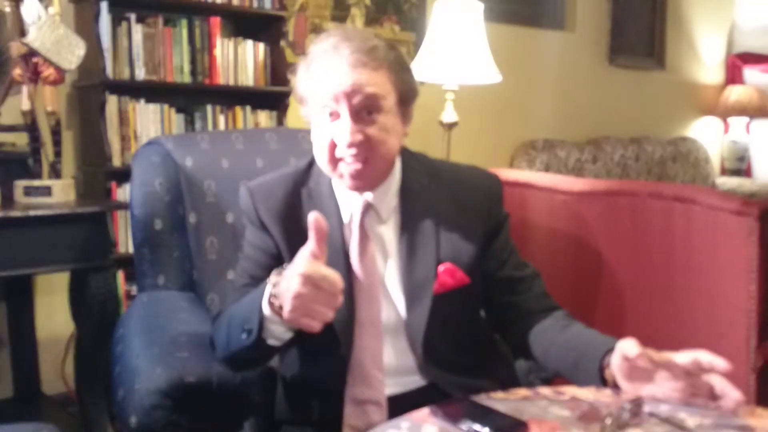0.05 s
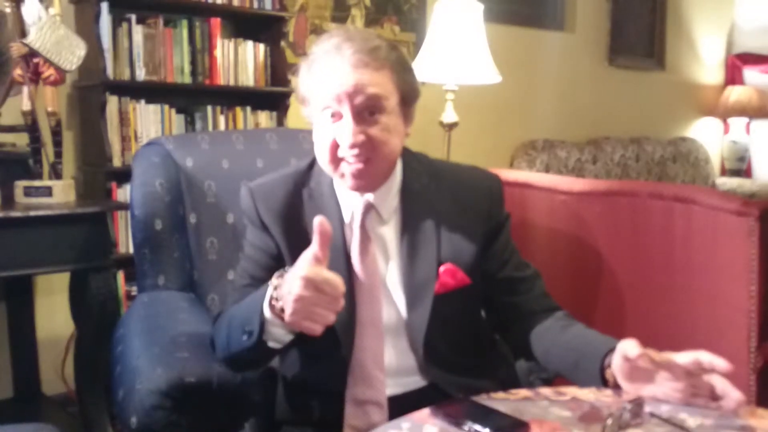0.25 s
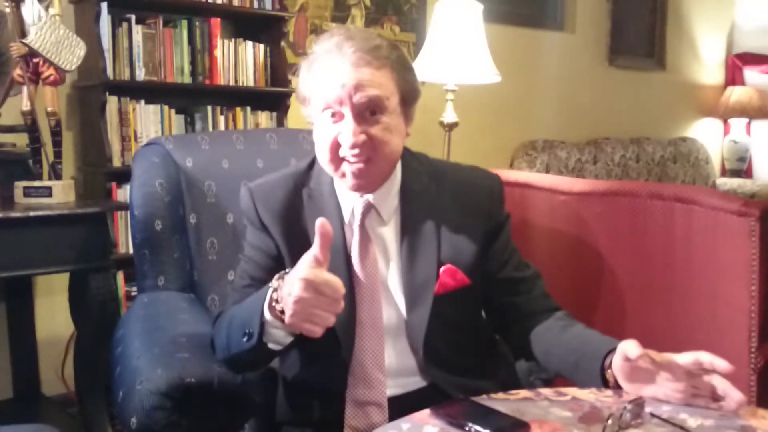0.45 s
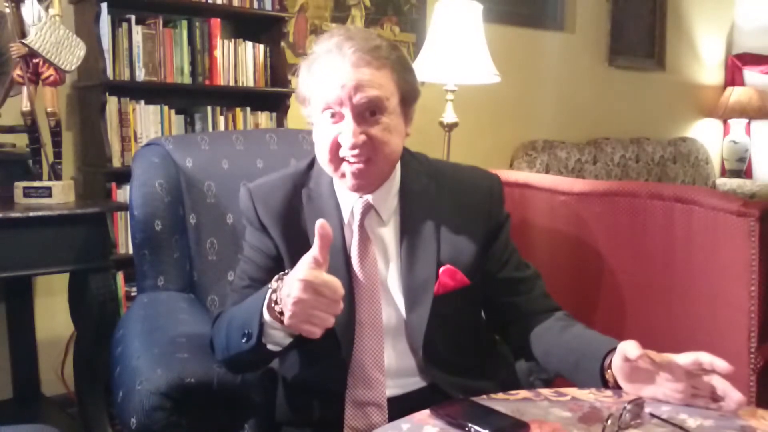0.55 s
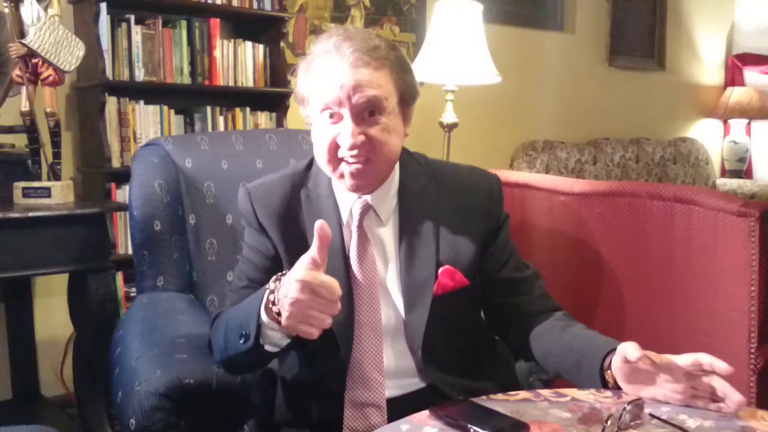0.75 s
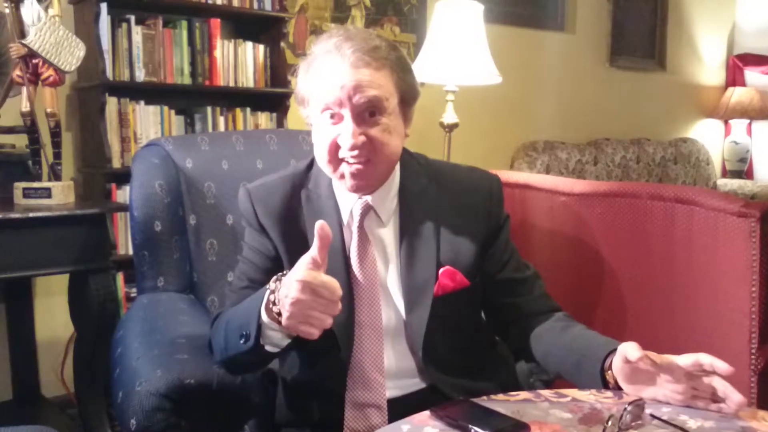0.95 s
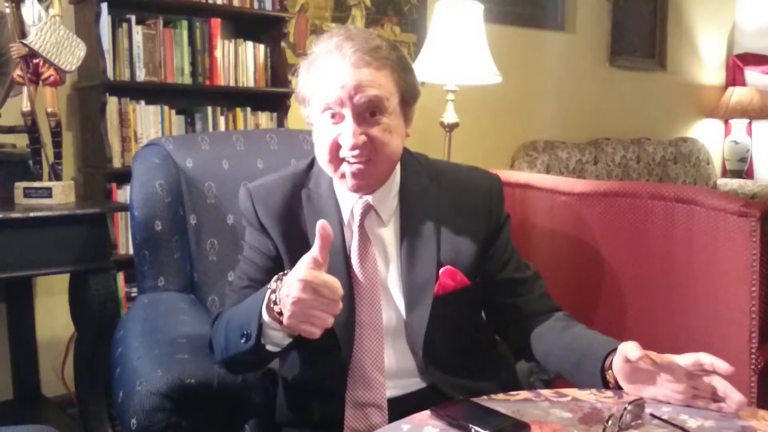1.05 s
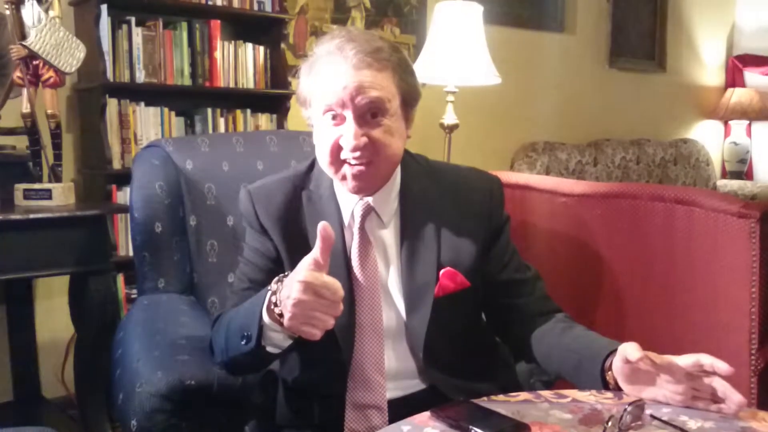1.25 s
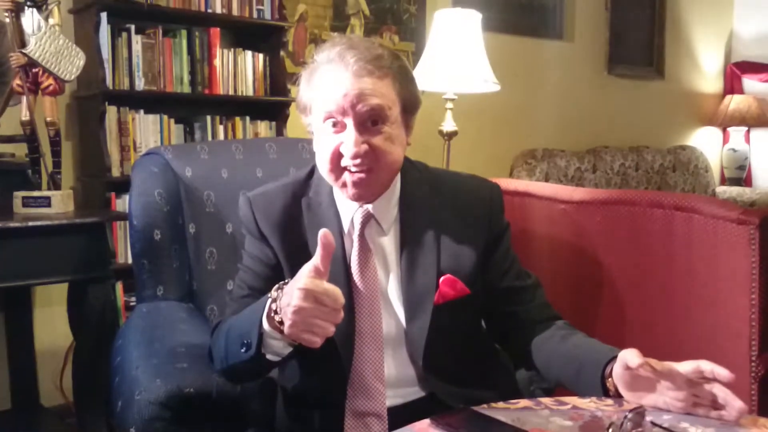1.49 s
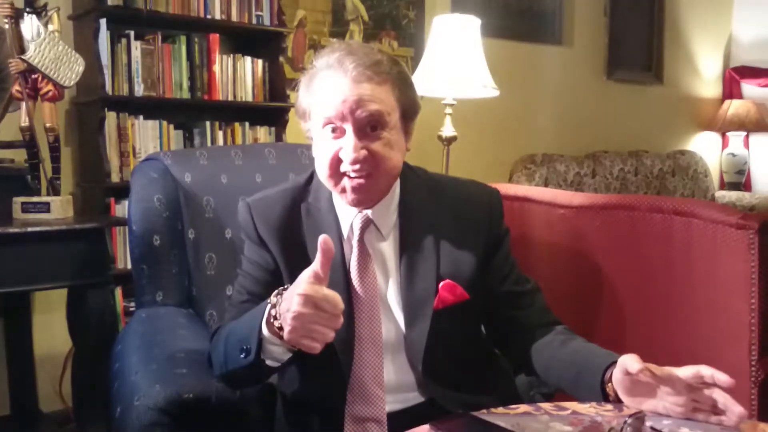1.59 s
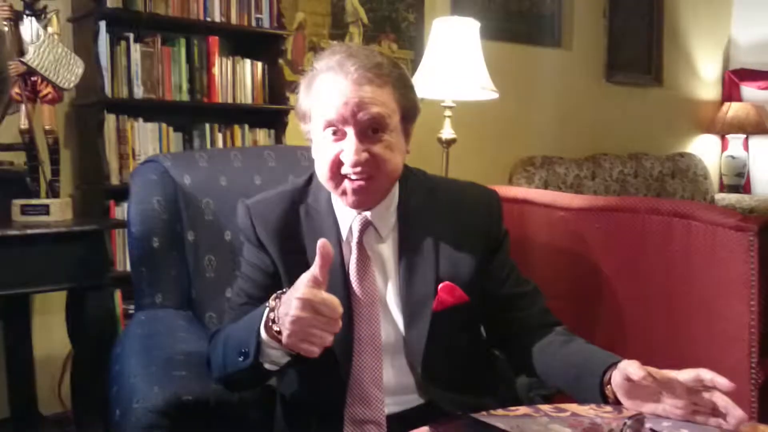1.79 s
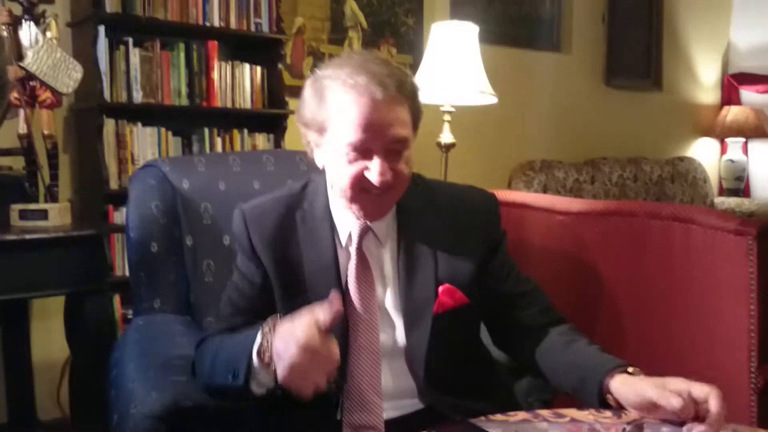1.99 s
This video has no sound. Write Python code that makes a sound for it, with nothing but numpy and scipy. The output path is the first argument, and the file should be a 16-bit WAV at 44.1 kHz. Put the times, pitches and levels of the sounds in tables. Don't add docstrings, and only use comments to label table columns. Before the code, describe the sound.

Two brief low phone vibration buzzes, close up, after a second of quiet, droning room air.

```python
import sys
import numpy as np
from scipy import signal
from scipy.fft import rfft, irfft, next_fast_len
from scipy.io import wavfile
from scipy.ndimage import uniform_filter1d, map_coordinates

SR = 44100
rng = np.random.default_rng(int(sys.argv[2]) if len(sys.argv) > 2 else 0)


def bounce(signal):
    frames = np.transpose(np.atleast_2d(signal))
    limited = np.clip(frames, -1, 1)
    pcm = np.round(limited * 32767).astype(np.int16)
    wavfile.write(sys.argv[1], SR, pcm)


def gain_from_decibels(decibels):
    exponent = np.asarray(decibels, float) / 20
    return 10 ** exponent


N = 89478

# (time [s], gain [dB])
BASS_GAIN = [
    (.95, -2),
    (1.1, 9.5),
    (1.25, 14.5),
    (1.5, 8),
    (1.75, 16),
    (2.03, 14),
]


def unit(x):
    return x / np.sqrt(np.mean(x ** 2) + 1e-20)


def along(points, hz):
    f, *values = np.transpose(points)
    return np.squeeze([np.interp(np.log(hz + 1), np.log(f + 1), v) for v in values])


def curves(rows):
    s, *columns = np.transpose(rows)
    return [np.interp(np.arange(N) / SR, s, c) for c in columns]


def wobble(rate):
    knots = rng.standard_normal(int(N * rate / SR) + 4)
    return map_coordinates(knots, [np.arange(N) * rate / SR])


def filtered(x, response):
    m = next_fast_len(N + 8192)
    return irfft(rfft(x, m) * response(np.fft.rfftfreq(m, 1 / SR)), m)[..., :N]


def room_air():
    # (frequency [Hz], left level [dB per Hz], right level [dB per Hz])
    air_colour = [(153, -15, -10.5), (675, 1.5, 3.5), (2000, -4, 2.5), (3980, -11.5, -2), (4670, -14, -10),
                  (7480, -8, -9.5), (11500, -20.5, -20.5), (15000, -15, -14.5)]
    # (frequency [Hz], correlation [-1 to 1])
    coherence = [(150, 0.075), (640, -0.36), (1400, 0.12), (15000, -0.065)]
    z = signal.stft(rng.standard_normal((2, N)), nperseg=512)[2]
    patches = uniform_filter1d(rng.standard_normal(z.shape[1:]), 6, 0)
    patches = uniform_filter1d(patches, 14, 1)
    pair = signal.istft(z * gain_from_decibels(1.4 * unit(patches)), nperseg=512)[1][:, :N]

    def mid_and_side(hz):
        angle = np.arccos(np.clip(along(coherence, hz), -1, 1)) / 2
        return np.array([np.cos(angle), np.sin(angle)])

    mid, side = filtered(pair, mid_and_side)
    ports = np.array([mid + side, mid - side])
    air = filtered(ports, lambda hz: gain_from_decibels(along(air_colour, hz)) * (hz > 100))
    return gain_from_decibels(-60.5 + 0.032 * curves(BASS_GAIN)[0]) * unit(air)


def distant_machine():
    # (frequency [Hz], level [dB per Hz])
    murmur_colour = [(30, -33), (60, -19), (100, -5.5), (250, -7), (600, -10.5), (1200, -23), (2500, -56)]
    # (frequency [Hz], level [dB])
    partials = [(50, -3.5), (59, -23), (68, 0), (77.5, -1.5), (87, -22)]
    bass_db, t = curves(BASS_GAIN)[0], np.arange(N) / SR
    a, b = filtered(rng.standard_normal((2, N)), lambda hz: gain_from_decibels(along(murmur_colour, hz)))
    lines = np.zeros(N)
    for hz, db in partials:
        phase = 2 * np.pi * hz * t + 1.05 * wobble(2.9) + 7 * rng.random()
        lines += gain_from_decibels(db + 2.4 * wobble(4.67)) * np.sin(phase)
    murmur = np.array([unit(1.1 * b - a), unit(a)]) * gain_from_decibels(-5.5)
    drone = unit(lines) * [[-1], [1]] + murmur
    return gain_from_decibels(-61.5) * drone * gain_from_decibels([-5 + 1.01 * bass_db, bass_db])


def table_top():
    # (time [s], frequency [Hz], left level [dB])
    hum_path = [
        (1.09, 52, -94),
        (1.13, 54.3, -31),
        (1.17, 48.2, -37),
        (1.21, 47.6, -41),
        (1.4, 47.7, -39),
        (1.58, 45.7, -45),
        (1.66, 53.4, -34.5),
        (1.7, 52, -62),
        (1.76, 49.7, -68),
    ]
    # (time [s], length [s], frequency [Hz], right level [dB])
    rattles = [
        (0.075, 0.026, 246, -54.5),
        (0.337, 0.22, 1943, -62),
        (1.299, .05, 277, -51),
        (1.705, 0.055, 216, -41),
        (1.79, 0.018, 195, -34),
        (1.865, 0.052, 183, -28),
        (1.923, 0.041, 202, -45),
        (1.957, 0.036, 226, -47),
    ]
    hz, db = curves(hum_path)
    hum = np.sqrt(2) * gain_from_decibels(db + 1.2 * wobble(5.3)) * np.sin(2 * np.pi * np.cumsum(hz) / SR)
    t, rattle = np.arange(N) / SR, np.zeros(N)
    for s, length, hz, db in rattles:
        swell = np.cos(np.pi * np.clip((t - s) / length, -.5, .5)) ** 2
        rattle += gain_from_decibels(db - 1) * swell * np.sin(2 * np.pi * hz * (t - s))
    return hum * gain_from_decibels([[0], [-49]]) + rattle * gain_from_decibels([[-41], [0]])


def ticks():
    # (time [s], right peak level [dB], frequency [Hz], left minus right [dB], decay by 60 dB [s])
    clicks = [(0.1517, -45, 2570, -25, 0.0045), (.151, -58, 7400, 11, 0.0046),
              (0.1542, -64.5, 8550, 9, .008), (0.158, -50, 2500, -10, .004), (.1585, -65, 7250, 6, .009),
              (0.162, -64, 8400, 10, 0.0095), (0.1758, -45.5, 14000, -16, .004),
              (0.175, -62, 8300, 16, .004), (0.1782, -66, 9300, 11, 0.0097), (0.184, -68, 7550, 10, .008),
              (.202, -67, 9500, 8, .006), (0.946, -48, 9100, -22, 0.0017), (0.9575, -36, 2000, -26, 0.0035),
              (0.9573, -42, 3400, -20, 0.0037), (0.963, -43, 855, -15, 0.01),
              (0.9572, -48, 850, -19, 0.0065), (0.970, -47, 830, -15, 0.01),
              (0.963, -36, 2000, -17, 0.0044), (0.9715, -47, 2600, -12, .003),
              (1.308, -39, 5200, -18, 0.0033), (1.327, -38, 3500, -15, .004), (1.342, -40, 3530, -23, .004),
              (1.3425, -51, 6400, -15, 0.0031), (1.3775, -36, 2320, -30, 0.0025),
              (1.378, -41.5, 820, -19, 0.0068), (1.546, -41, 2200, -21, 0.0026),
              (1.553, -46.5, 3550, -27, 0.013), (1.563, -39, 2000, -21, 0.0035),
              (1.565, -39.5, 840, -17, 0.0063), (1.5703, -32.5, 4230, -25, 0.0033),
              (1.571, -32, 2300, -24, .004), (1.578, -41, 3800, -22, .004),
              (1.9395, -40, 4400, -21, 0.0046), (1.9425, -35, 3700, -25, .004),
              (1.9421, -39, 6600, -17, 0.0033), (1.9759, -36.5, 3430, -27, 0.0058),
              (1.9755, -38, 2330, -20, 0.0048), (1.9755, -39, 820, -15, 0.0047)]
    out, t = np.zeros((2, N + SR)), np.arange(600) / SR
    for s, db, hz, pan_db, t60 in clicks:
        envelope = gain_from_decibels(db + 8 - 60 * t / t60) * (1 - np.exp(-t / 0.00018))
        roughness = 0.038 * np.sqrt(hz / 100) * np.cumsum(rng.standard_normal(len(t)))
        ring = envelope * np.sin(2 * np.pi * hz * t + roughness)
        out[:, round(s * SR):][:, :len(t)] += ring * gain_from_decibels([[pan_db], [0]])
    return filtered(out[:, :N], lambda hz: hz ** 2 / (hz ** 2 + 500 ** 2))


def shaft_spins():
    # (power on [s], power off [s], top speed [Hz], shake missing at the start [dB],
    # gain of the middle orders [dB])
    buzzes = [
        (.953, 1.298, 177.1, -9.5, -6.5),
        (1.553, 1.899, 177.0, -4.5, 1),
    ]
    spin_up_s, settle_s, settle_share = .025, .065, .075
    coast_s, creep = .036, .25
    wander_hz = .15 * wobble(26.24)
    spins = []
    for on, off, top_hz, missing_db, valley_db in buzzes:
        cut = slice(round(on * SR), min(round(off * SR) + SR // 8, N))
        t = np.arange(N)[cut] / SR - on
        driven = np.minimum(t, off - on)
        rise = 1 - (1 - settle_share) * np.exp(-driven / spin_up_s) - settle_share * np.exp(-driven / settle_s)
        speed = np.abs(rise * (creep + (1 - creep) * np.exp((driven - t) / coast_s)))
        hz = (top_hz + wander_hz[cut]) * speed
        spins.append((cut, t, speed, hz, top_hz, missing_db, valley_db))
    return spins


def brush_scrape(spins):
    # (frequency [Hz], left level [dB], right level [dB])
    scrape_colour = [(246, 8.5, -36), (804, -19, 9.5), (2000, -39, -3.5), (4600, -42, 0.5), (6960, -4, -8),
                     (9700, -7, -28), (10600, -35, -7.5), (15800, -15, -13)]
    noise = rng.standard_normal((2, N))
    scrape = filtered(noise[1] + 0.91 * noise, lambda hz: gain_from_decibels(along(scrape_colour, hz)) * (hz > 200))
    scrape = gain_from_decibels(-52.5) * scrape / scrape[1].std()
    out = np.zeros((2, N))
    for cut, t, speed, hz, *_ in spins:
        beat = np.cos(4 * np.pi * (np.cumsum(hz) / SR + 0.17))
        apart = 1.15 * (1 - speed) * (np.exp(2.1 * (beat - 1)) - .3)
        gate = 1 + 0.3 * beat + apart
        chatter = 1 + 7.5 * (1 - speed)
        fade = np.clip((t[-1] - t) / 0.11, 0, 1)
        out[:, cut] += speed ** 2.08 * chatter * fade * gate * scrape[:, cut]
    return out


def shaft_orders(spins):
    # (left level [dB], right level [dB])
    low_orders, high_orders, top_orders = [(-16, -40), (-47, -53), (-58, -53), (-71, -49), (-63, -51),
                                           (-66, -56), (-72, -58), (-68, -47), (-72, -43), (-66, -45),
                                           (-63, -43), (-67, -42), (-70, -49), (-74, -58), (-71, -57),
                                           (-70, -51), (-65, -44), (-74, -54), (-74, -46), (-71, -46),
                                           (-82, -50), (-76, -43), (-71, -59), (-76, -49), (-75, -54),
                                           (-75, -58), (-85, -54), (-93, -54), (-75, -60), (-79, -58)], [(-72, -60), (-67, -64), (-81, -60),
                                                               (-74, -53), (-64, -67), (-61, -56),
                                                               (-60, -54), (-67, -64), (-56, -57),
                                                               (-61, -61), (-67, -64), (-57, -56),
                                                               (-63, -62), (-65, -75), (-75, -65),
                                                               (-63, -62), (-75, -67), (-74, -64),
                                                               (-71, -70), (-75, -78), (-71, -70),
                                                               (-75, -70), (-73, -68), (-79, -70),
                                                               (-69, -78), (-75, -66), (-78, -65),
                                                               (-80, -71), (-83, -60), (-77, -65)], [(-86, -72), (-76, -59),
                                                                                    (-81, -69), (-83, -72),
                                                                                    (-84, -64), (-83, -61),
                                                                                    (-84, -64), (-85, -66),
                                                                                    (-89, -67), (-86, -65),
                                                                                    (-89, -75), (-85, -63),
                                                                                    (-87, -72), (-89, -69),
                                                                                    (-85, -72), (-88, -72),
                                                                                    (-85, -67), (-89, -82),
                                                                                    (-87, -74), (-86, -71),
                                                                                    (-88, -81), (-88, -81),
                                                                                    (-87, -79), (-90, -76),
                                                                                    (-98, -87), (-88, -74),
                                                                                    (-93, -76), (-101, -79)]
    # (frequency [Hz], gain [dB])
    case = [(300, -14), (1000, -11), (1800, 2), (2600, -5), (3700, -3), (5200, -12), (8000, -14),
            (15000, -24)]
    contacts = [(1, 0, 0), (6, -.15, 0), (14, -.13, .8), (28, -.15, .6), (44, .15, .5), (56, -.17, .3)]
    # (frequency [Hz], lead [rad])
    left_leads = [(180, 1.6), (350, .9), (530, 1.8), (1900, 3), (4300, -2.5), (6350, -.8), (7000, -3.3),
                  (7450, -5.3)]
    shake_law, right_shake_law, buzz_law, pattern_law = 2.7, 0.64, 3.36, 2.3
    swell_s, stall_hz, bass_orders = 0.17, 51.4, 2.7

    out, bass_db = np.zeros((2, N)), curves(BASS_GAIN)[0]
    k = np.arange(1, 89)[:, None]
    start, place, second = np.transpose(contacts)
    group = np.searchsorted(start, k, "right") - 1
    both = 1 + second[group] * np.exp(-2j * np.pi * (.6 * k - .2))
    angle = place[group] - np.angle(both) / (2 * np.pi * k)
    order_db = np.vstack([low_orders, high_orders, top_orders]) + 4.01 + 0.35 * (k == 1)
    pattern_db = (order_db - uniform_filter1d(order_db, size=7, axis=0)) * (k > 7)
    scatter = rng.standard_normal((2, len(k), 1))
    spread = .3 + .015 * k
    jitter_turns, size_db = .0007 * wobble(120), .6 * wobble(59.35)

    for cut, t, speed, hz, top_hz, missing_db, valley_db in spins:
        remaining = t[-1] - t
        case_db = along(case, k * hz) - along(case, k * top_hz)[:, None]
        valley = valley_db * np.exp(-((k - 28.1) / 4.1) ** 2)
        colour = gain_from_decibels(case_db + valley + size_db[cut]) * speed ** buzz_law * np.clip(remaining / .03, 0, 1)
        stall = 1 + (stall_hz / (hz + 1)) ** 4
        colour[0] = speed ** shake_law / stall * np.clip(remaining / 0.049, 0, 1)
        swell_db = missing_db * np.exp(-t / swell_s) + 0.42 * (bass_db[cut] - bass_db.max())
        colour = colour * gain_from_decibels(swell_db * np.exp((1 - k) / bass_orders))
        turns = np.cumsum(hz) / SR
        phase = 2 * np.pi * k * (turns - angle + jitter_turns[cut] * (k > 1))
        for ch in range(2):
            left = 1 - ch
            formed_db = order_db[:, ch, None] - pattern_db[:, ch, None] * (1 - speed ** pattern_law)
            shake = np.where(k > 1, 1, (speed + 0.026) ** (ch * (right_shake_law - shake_law)))
            offset = spread * (scatter[1] + left * 0.52 * scatter[0])
            offset = offset + along(left_leads, k * top_hz)[:, None] * left
            out[ch, cut] += (gain_from_decibels(formed_db) * colour * shake * np.cos(phase + offset)).sum(0)
    return out


def motor():
    spins = shaft_spins()
    return brush_scrape(spins) + shaft_orders(spins)


def scene():
    return room_air() + distant_machine() + table_top() + ticks() + motor()


def low_pass(x):
    return signal.sosfilt(signal.butter(12, 15970, fs=SR, output="sos"), x)


def record(dry):
    mix = filtered(dry, lambda hz: (hz < 15760) * 1j * hz / (1j * hz + 5))
    return low_pass(mix)


dry = scene()
out = record(dry)
bounce(out)
```